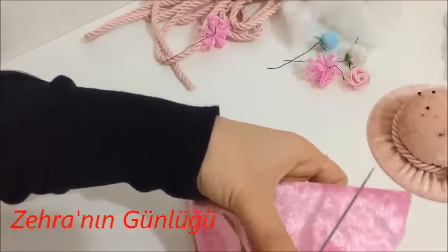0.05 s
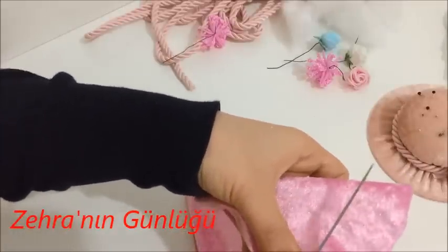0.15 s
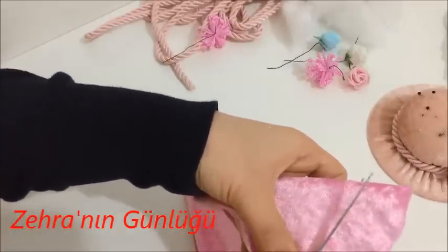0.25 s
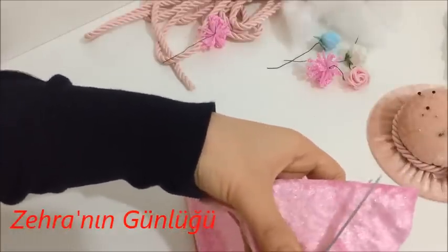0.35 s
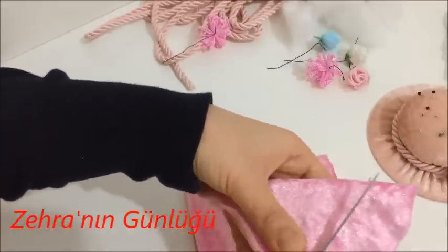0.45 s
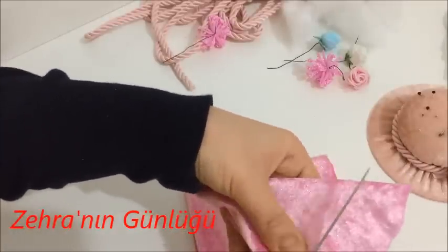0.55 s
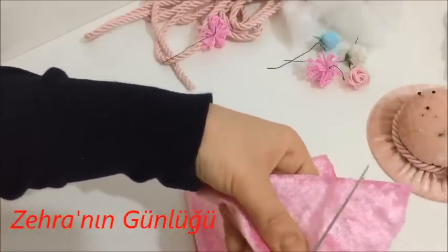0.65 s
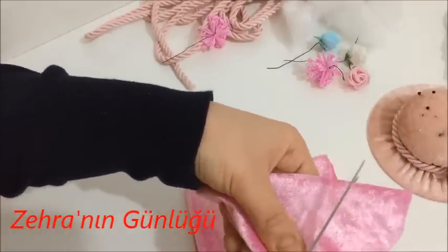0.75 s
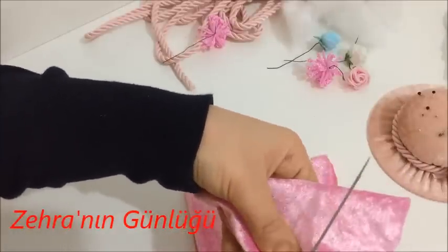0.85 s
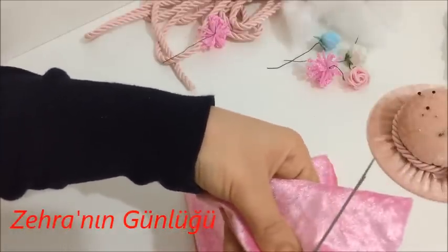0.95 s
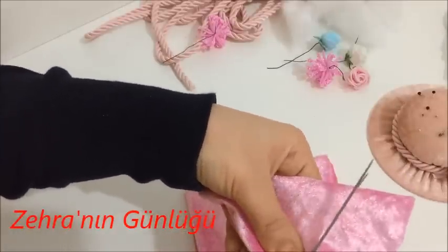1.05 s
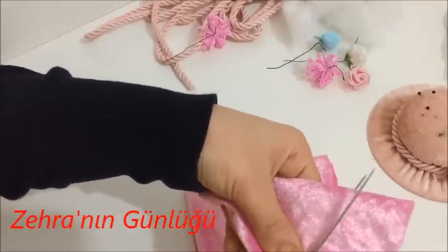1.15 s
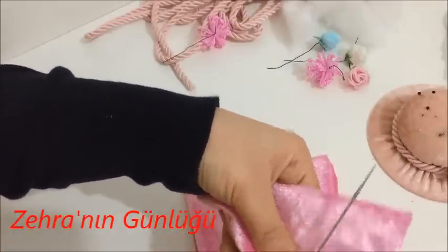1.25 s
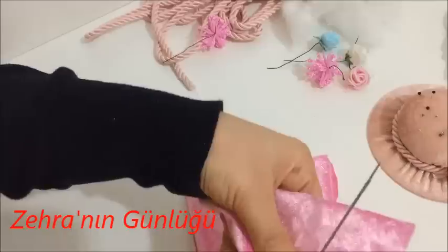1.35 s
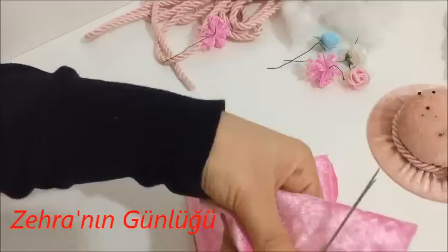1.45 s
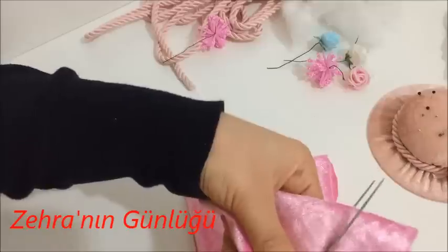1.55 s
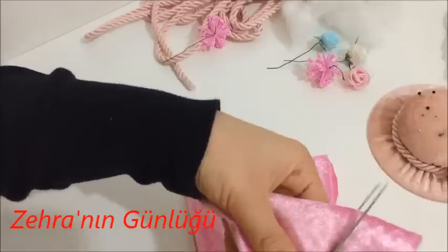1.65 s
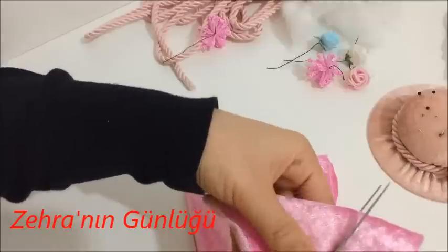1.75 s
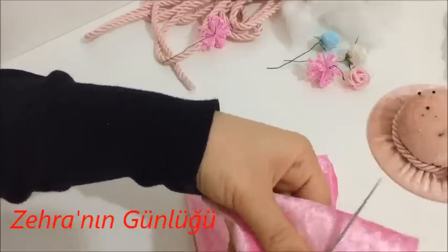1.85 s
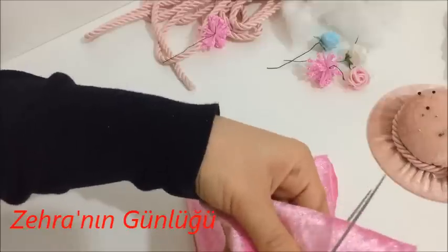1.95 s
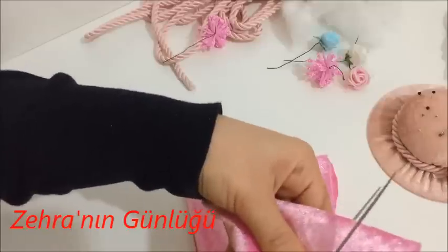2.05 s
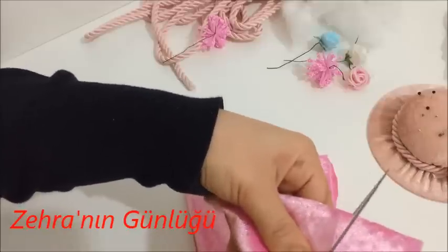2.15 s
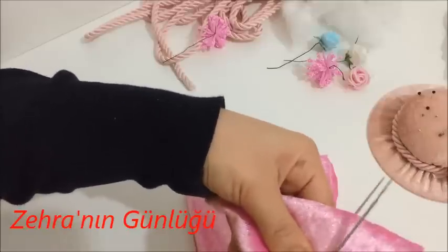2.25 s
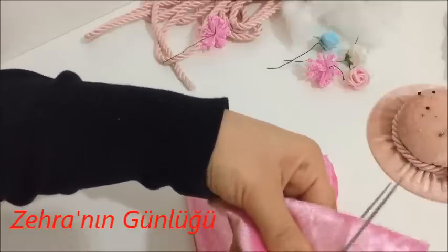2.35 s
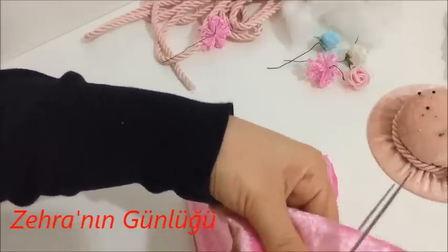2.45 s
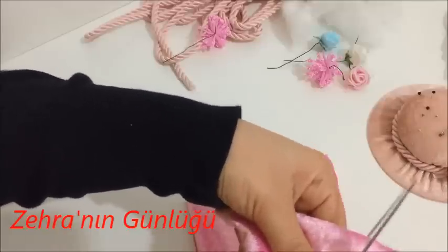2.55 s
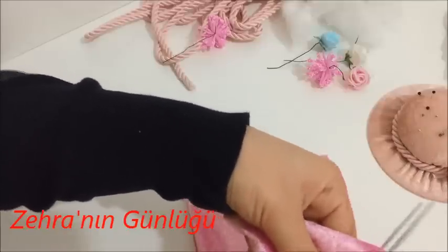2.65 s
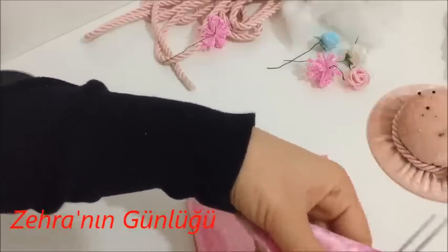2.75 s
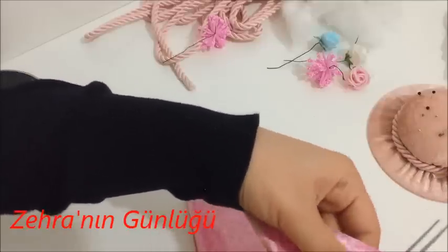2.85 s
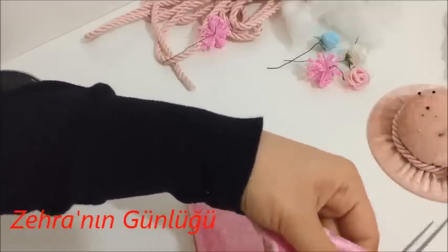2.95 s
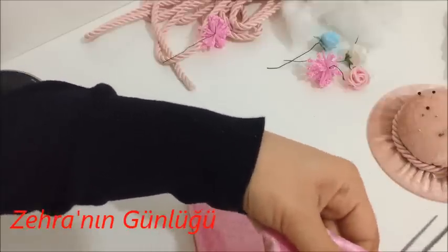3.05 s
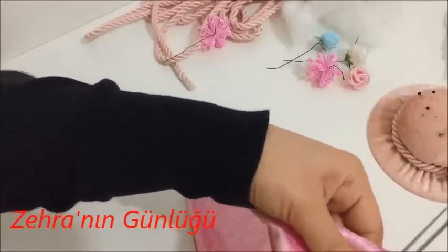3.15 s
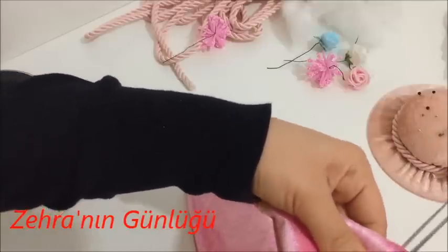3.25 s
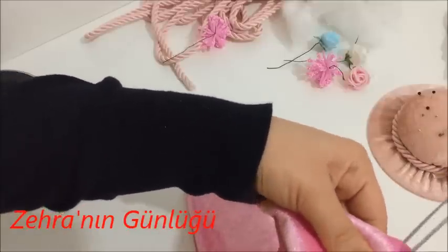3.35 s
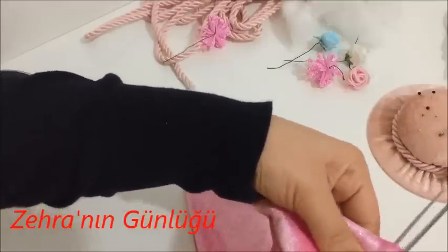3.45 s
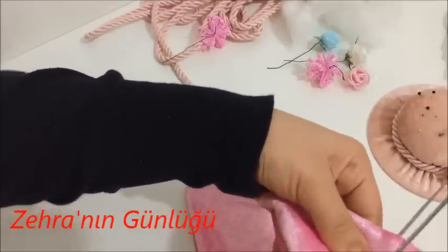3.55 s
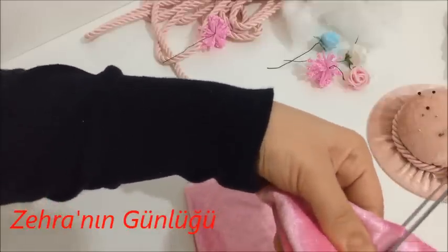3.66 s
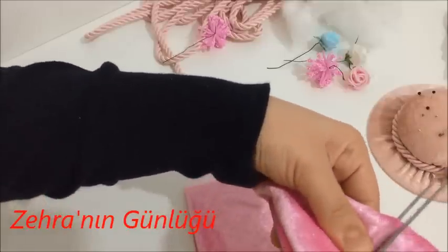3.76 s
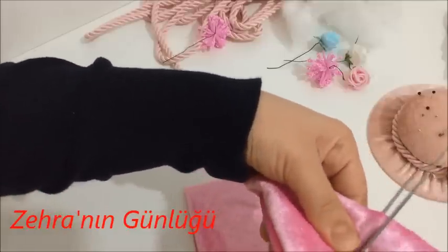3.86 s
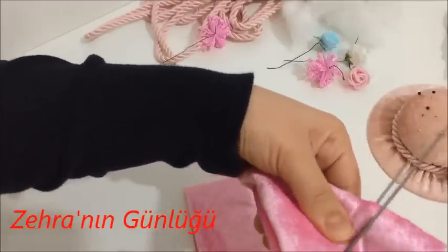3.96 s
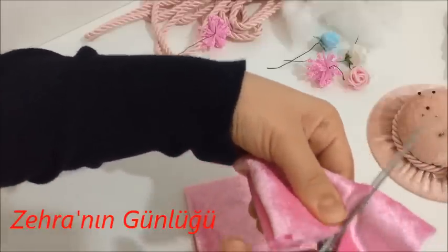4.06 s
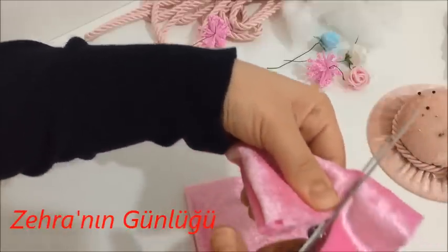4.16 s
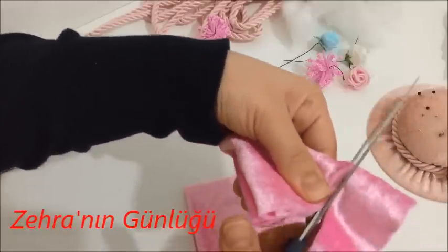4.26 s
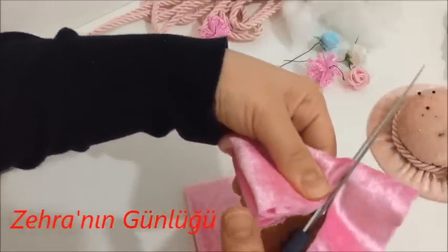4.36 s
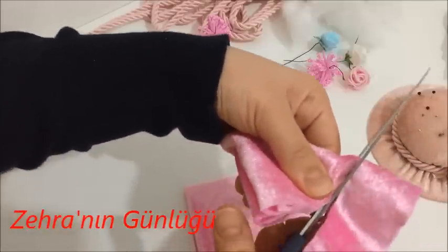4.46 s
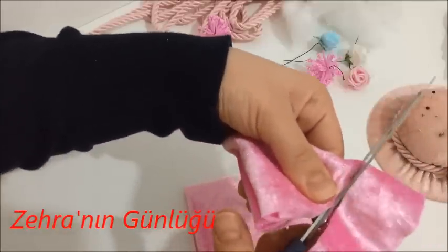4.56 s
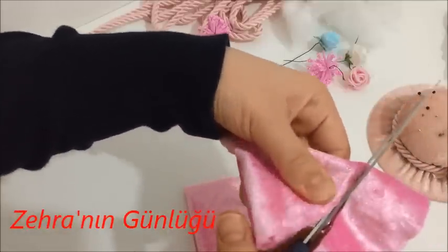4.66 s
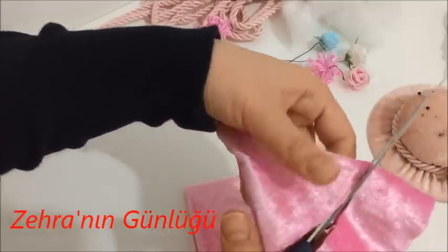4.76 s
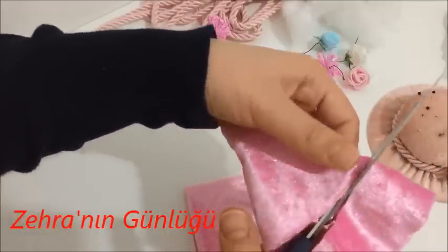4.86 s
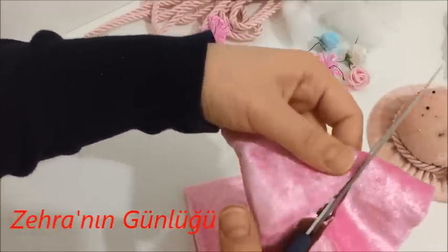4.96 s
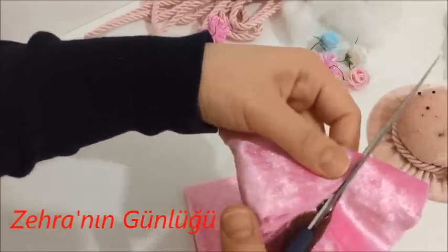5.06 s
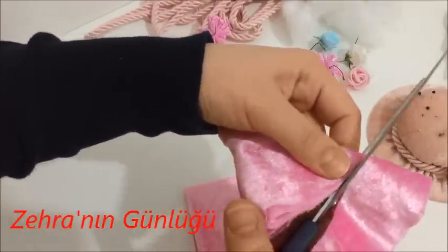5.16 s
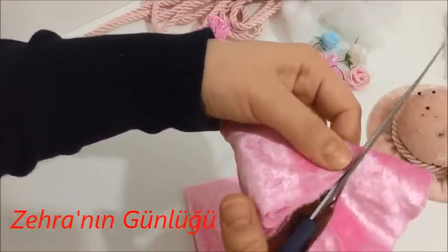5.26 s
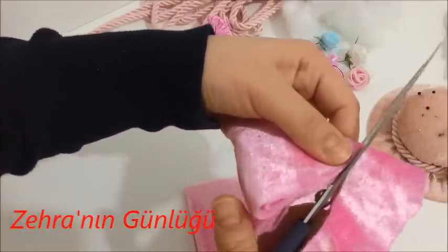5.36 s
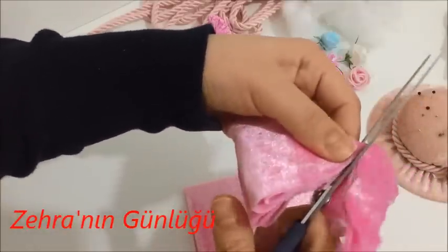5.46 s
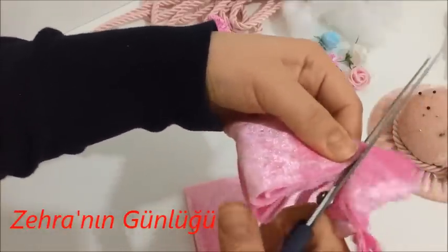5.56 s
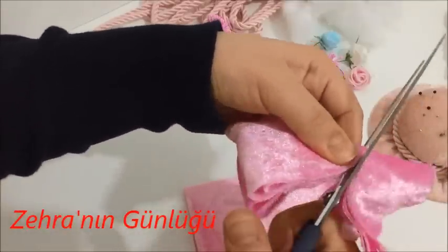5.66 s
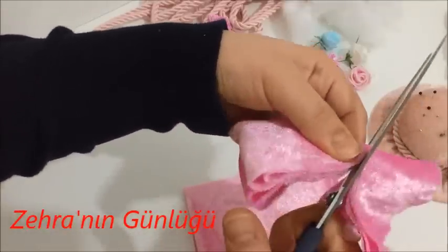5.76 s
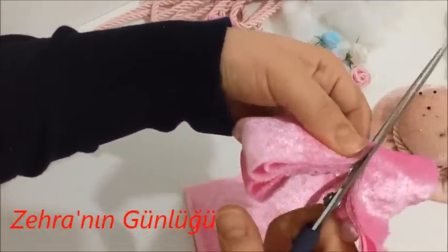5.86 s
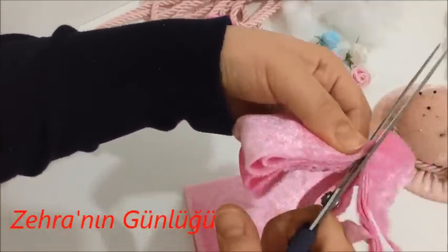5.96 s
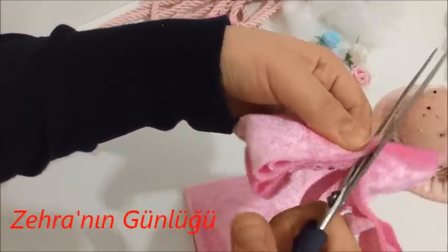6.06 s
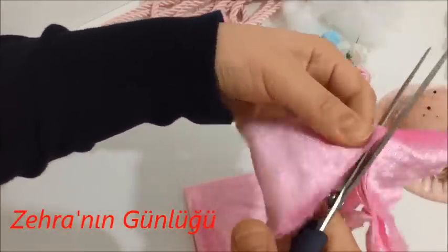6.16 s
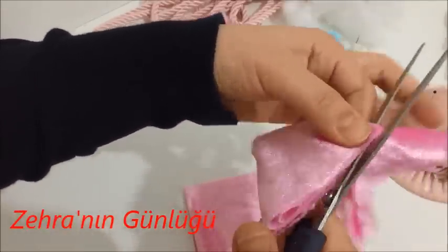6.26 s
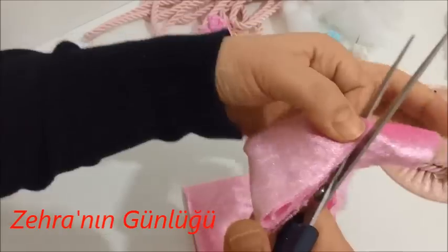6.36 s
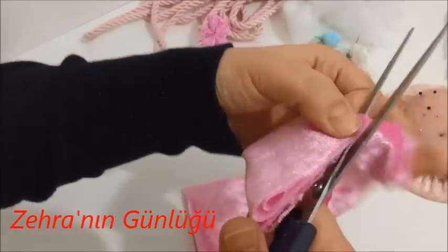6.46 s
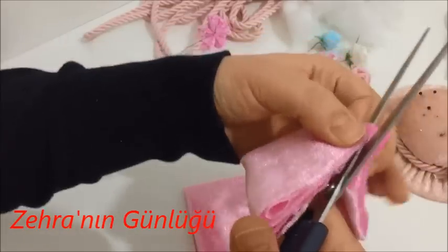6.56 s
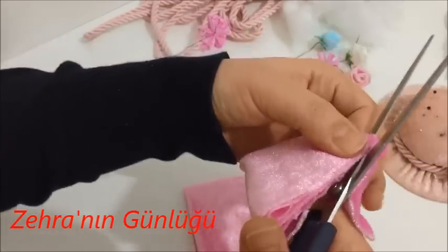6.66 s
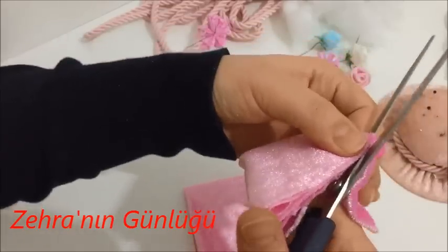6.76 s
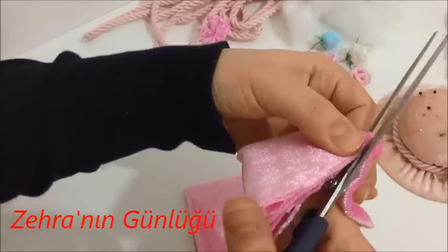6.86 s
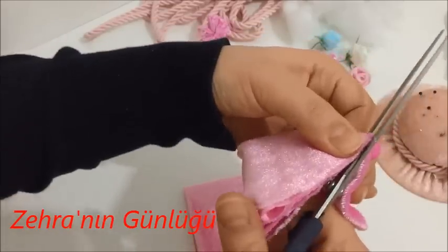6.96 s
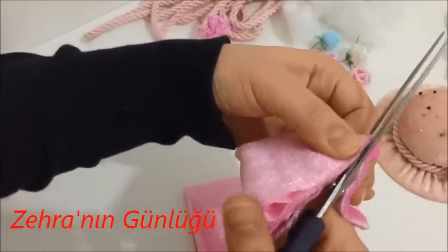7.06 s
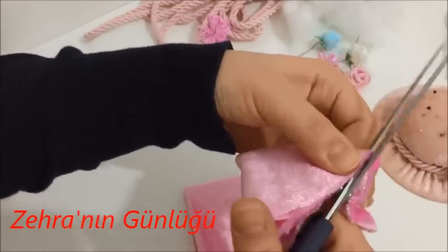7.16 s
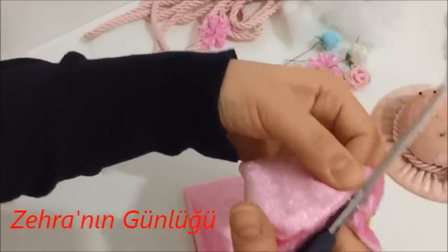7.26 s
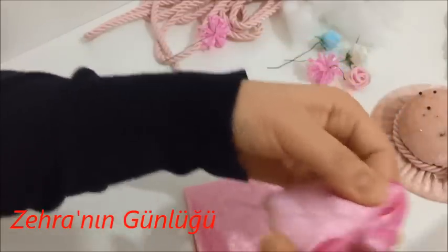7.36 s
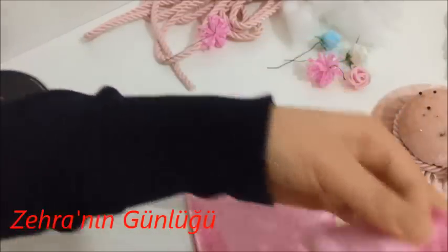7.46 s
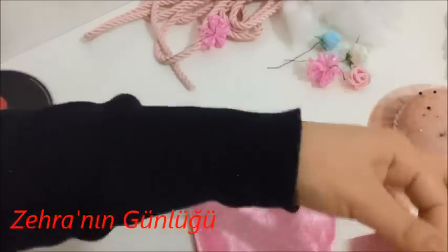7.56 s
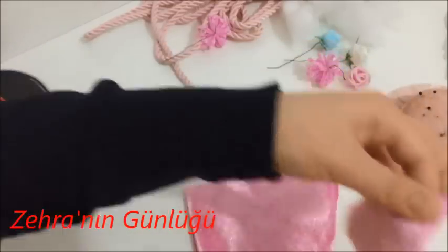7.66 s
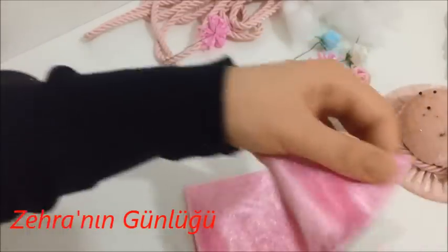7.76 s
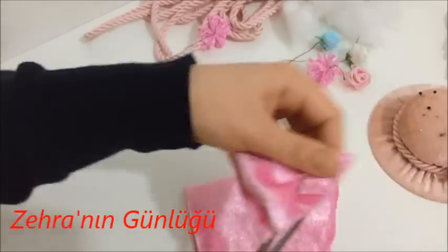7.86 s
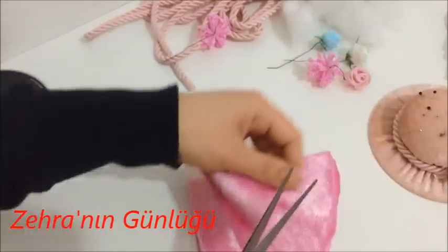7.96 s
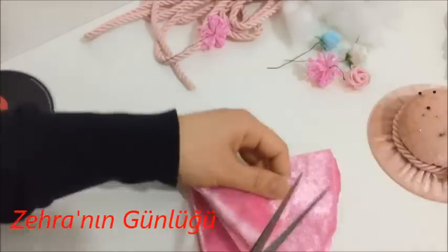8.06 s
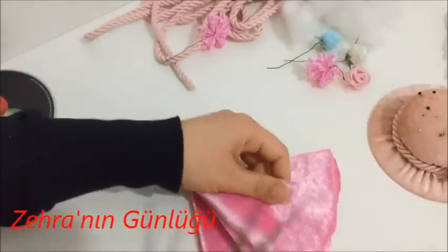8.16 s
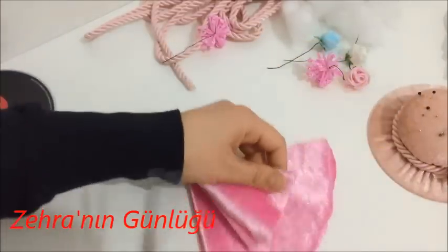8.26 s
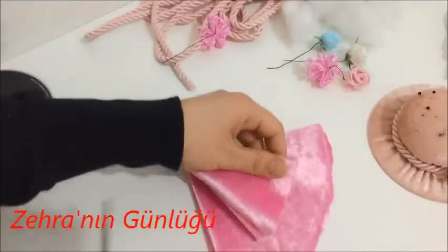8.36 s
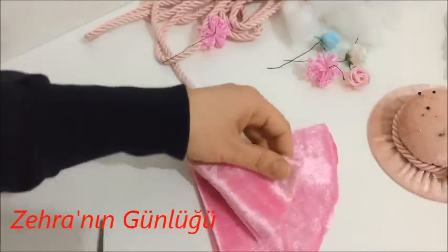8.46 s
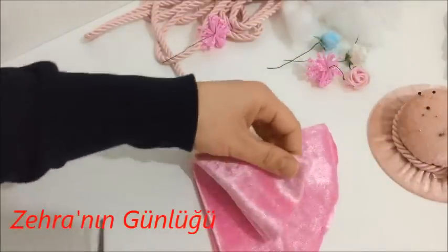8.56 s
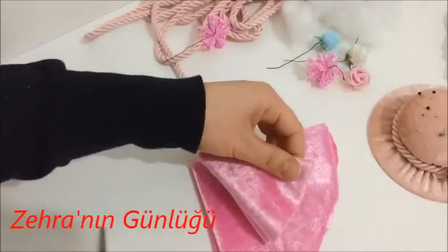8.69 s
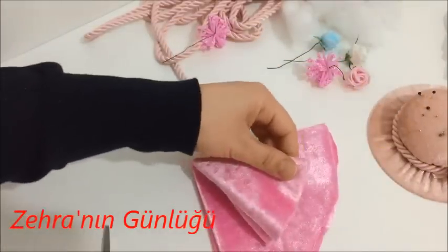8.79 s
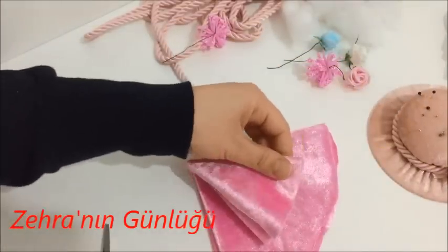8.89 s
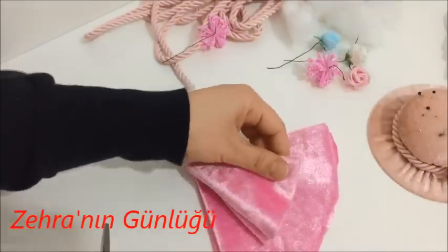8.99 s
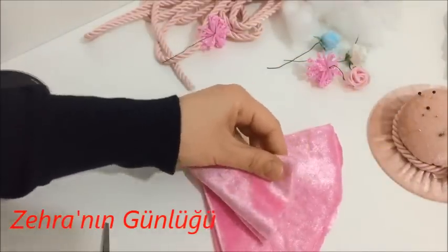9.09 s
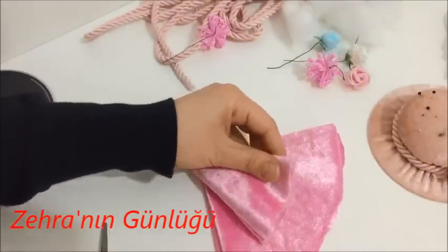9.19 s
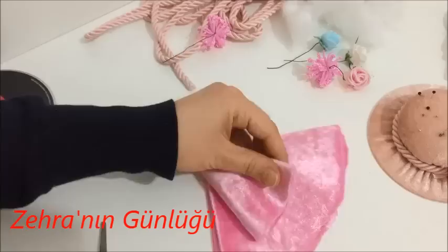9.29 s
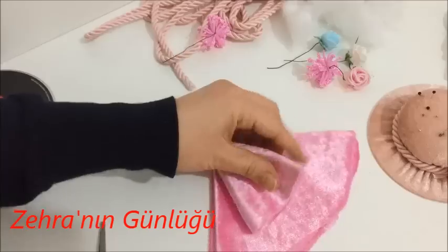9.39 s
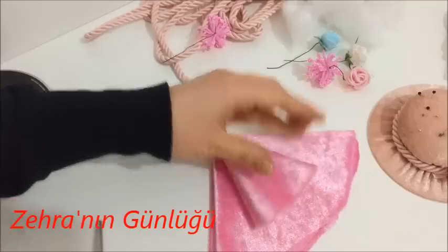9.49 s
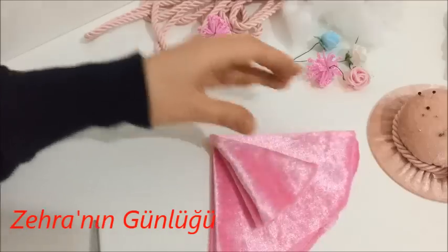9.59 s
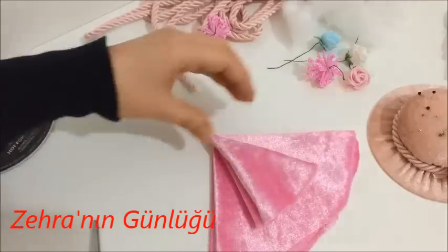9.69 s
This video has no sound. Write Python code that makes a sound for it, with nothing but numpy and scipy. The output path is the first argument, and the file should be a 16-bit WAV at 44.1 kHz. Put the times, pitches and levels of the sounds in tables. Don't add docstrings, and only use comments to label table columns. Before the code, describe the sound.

Crisp, gritty scissor cuts through cloth, spaced unevenly, followed by a squeaky pivot, light table taps and a sudden loud metallic drop.

```python
import sys
import numpy as np
from scipy import signal
from scipy.fft import rfft, irfft
from scipy.io import wavfile

SR = 44100
rng = np.random.default_rng(int(sys.argv[2]) if len(sys.argv) > 2 else 0)


def output_pcm(signal):
    pcm = np.clip(np.atleast_2d(signal).T, -1, 1) * 32767
    wavfile.write(sys.argv[1], SR, np.round(pcm).astype(np.int16))


def voltage_ratio(decibels):
    exponent = np.asarray(decibels, float) / 20
    return 10 ** exponent


N = 429093

# start in seconds, peak in dB.
BUNDLES = [(0.2546, -45.5), (0.292, -44), (0.31, -44), (0.3244, -48), (1.1555, -47), (1.5726, -35),
           (1.611, -37), (1.6432, -49), (1.665, -45.5), (2.2676, -38), (2.326, -43), (2.357, -45.5),
           (2.6933, -40.5), (2.7574, -43), (3.3243, -43), (3.3472, -46), (3.7257, -46.5), (3.785, -39),
           (3.8187, -40), (4.162, -40.5), (4.2285, -42), (4.2587, -48), (4.595, -41.5), (4.6306, -44.5),
           (5.4526, -48), (5.472, -45), (7.0495, -41), (7.056, -35), (7.319, -46), (7.5096, -48)]
# pitch in Hz, width in Hz, level in dB.
LOW_MODES = [(1320, 610, -6), (1650, 180, -6.5), (2510, 530, -1.5), (2684, 200, 6), (3690, 810, 1),
             (4520, 430, -4), (5680, 1700, 0), (6500, 1800, -4), (7440, 240, -12)]
EDGE_MODES = [(8040, 930, -5.5), (9140, 1050, 1), (9910, 670, -5), (10780, 420, -3.5), (11280, 400, -12)]
HISS_MODES = [(11870, 890, -7.5), (14200, 990, -8), (15000, 1100, -6), (16500, 400, -1)]
# time in seconds, gain of the fibre hiss in dB, ring of the free edge in Hz.
FACING = [(0.3, 0, 9540), (1.2, 1, 9450), (1.6, -1, 9540), (2.3, -3, 9470), (2.7, 3, 8400),
          (3.35, -0.5, 9660), (3.8, 2.5, 9160), (4.2, 4, 10030), (4.6, 3, 10550), (5.45, 2, 8900),
          (5.95, -9, 8700), (7.05, -3, 8930), (7.22, 8, 9500), (7.31, 5, 8500), (7.53, 0, 9200),
          (8.45, 5, 10600)]
EDGE_FACING_SHARE = -0.24


def scissors():
    time_s = np.arange(N) / SR
    all_strokes = strokes()
    low_level, edge_level, hiss_level = np.zeros((3, N))
    for rows in all_strokes:
        shear_db = in_time(rows, column=1)
        low_level += voltage_ratio(shear_db)
        edge_level += voltage_ratio(shear_db + in_time(rows, column=2))
        hiss_level += voltage_ratio(shear_db + in_time(rows, column=3))

    path = np.concatenate([rows[1:3] for rows in all_strokes])
    low_hz = np.interp(time_s, path[:, 0], path[:, 4])
    climb = np.interp(time_s, path[:, 0], path[:, 5])
    held_s, held_db, held_hz = np.transpose(FACING)
    facing_db = np.interp(time_s, held_s, held_db)
    edge_hz = np.interp(time_s, held_s, held_hz) * climb

    bundle_s, peak_db = np.transpose(BUNDLES)
    starts = np.zeros(N)
    starts[np.round(bundle_s * SR).astype(int)] = voltage_ratio(peak_db - 7.5)
    t = np.arange(SR // 40) / SR
    swell = signal.fftconvolve(starts, (t / 0.0037 * np.exp(1 - t / 0.0027)) ** 2)[:N]
    steady = np.sqrt(low_level ** 2 + edge_level ** 2 + hiss_level ** 2) + 1e-7
    uneven = voltage_ratio(2.8 * drift(90))
    effort = voltage_ratio(-1.5) * uneven + swell / steady

    threads = grit(per_s=9000, spread_db=2.0)
    low = resonate(threads, LOW_MODES, wander_db=3.0, rate_hz=12.5)
    low = low + 0.61 * glide(threads, low_hz, width_hz=165)
    edge = resonate(threads, EDGE_MODES, wander_db=5.0, rate_hz=46)
    edge = edge + 0.66 * glide(threads, edge_hz, width_hz=210)
    hiss = resonate(threads, HISS_MODES, wander_db=3.5, rate_hz=15)
    low = voltage_ratio(-1.5) * low_level * low
    edge = voltage_ratio(0.5 + EDGE_FACING_SHARE * facing_db) * edge_level * edge
    hiss = voltage_ratio(facing_db) * hiss_level * hiss
    return effort * (low + edge + hiss)


# bite in seconds, length in seconds, shear in dB at the end,
# growth in dB over the stroke, low ring in Hz at the bite.
CUTS = [(0.258, 0.077, -58, 13.5, 3030), (1.155, 0.081, -58.5, 13.5, 3380), (1.577, 0.076, -61, 2.5, 2800),
        (2.271, 0.071, -65, -1, 3700), (2.686, 0.082, -61, 6, 3700), (3.313, 0.069, -60, 6.5, 3700),
        (3.731, 0.099, -65.5, 1.5, 4860), (4.143, 0.076, -57, 12, 4720), (4.547, 0.087, -62.5, 8, 4460),
        (5.408, 0.1, -65, 5.5, 3070), (5.929, 0.043, -68, 1.5, 3300), (6.021, 0.0085, -69, 0, 3530),
        (7.005, 0.044, -72, 0.5, 2860), (7.057, 0.015, -57.5, 0.5, 2940), (7.307, .024, -68.5, -3, 3800)]
# start in seconds, length in seconds, level in dB at the end,
# growth in dB, brightness in dB.
SLIDES = [(0.11, 0.039, -75, 5, -1), (1.396, 0.057, -74.5, 1, -1), (2.517, 0.047, -70.5, 3.5, -2.5),
          (3.575, 0.027, -76, 1, -1.5), (3.988, .04, -74, -0.5, -0.5), (4.392, 0.041, -71, 2, -3),
          (7.218, .022, -73.5, 0, 1.5), (7.512, .03, -75, 0, 0), (8.413, 0.049, -58, 16, -3.5)]
CUT_EDGE_DB, CUT_HISS_DB = (2.5, 0), (1, -8)
SLIDE_EDGE_DB, SLIDE_HISS_DB = (3.5, 0), (-2, -4)
RING_SAG, SLIDE_RING_HZ = 0.937, 3050


def strokes():
    all_strokes = []
    for *row, hz in CUTS:
        all_strokes.append(stroke(*row, CUT_EDGE_DB, CUT_HISS_DB, (hz, hz * RING_SAG)))
    for *row, bright_db in SLIDES:
        edge_db = np.add(SLIDE_EDGE_DB, 2.8 * bright_db)
        hiss_db = np.add(SLIDE_HISS_DB, bright_db)
        all_strokes.append(stroke(*row, edge_db, hiss_db, [SLIDE_RING_HZ] * 2))
    return sorted(all_strokes, key=lambda rows: rows[1][0])


BITE_SHARE, BITE_DB = 0.51, 11.5
LET_GO_S, LET_GO_DB = 0.029, 27
EDGE_CLIMB = (0.92, 1.027)


def stroke(s, length_s, end_db, growth_db, edge_db, hiss_db, low_hz):
    bite, end = ([edge_db[k], hiss_db[k], low_hz[k], EDGE_CLIMB[k]] for k in range(2))
    bite_db, end_s = end_db - growth_db, s + length_s
    return [(s - BITE_SHARE * length_s, bite_db - BITE_DB, *bite), (s, bite_db, *bite),
            (end_s, end_db, *end), (end_s + LET_GO_S, end_db - LET_GO_DB, *end)]


def grit(per_s, spread_db):
    sizes = voltage_ratio(spread_db * np.minimum(rng.exponential(1, N), 4)) * rng.choice([-1, 1], N)
    return sizes * (rng.random(N) < per_s / SR)


def resonate(x, modes, wander_db, rate_hz):
    out = 0
    for k, (hz, width_hz, level_db) in enumerate(modes):
        ring = peak(peak(x, hz, width_hz), hz, width_hz)
        out = out + (-1) ** k * voltage_ratio(level_db + wander_db * drift(rate_hz)) * ring
    return rms_one(out)


def glide(x, hz, width_hz):
    turn = np.exp(2j * np.pi * np.cumsum(hz) / SR)
    r = np.exp(-np.pi * width_hz / SR)
    return rms_one((turn * signal.lfilter([1], [1, -r], x / turn)).real)


def peak(x, hz, width_hz):
    r = np.exp(-np.pi * width_hz / SR)
    poles = [1, -2 * r * np.cos(2 * np.pi * hz / SR), r * r]
    return signal.lfilter([1, 0, -1], poles, x) * (1 - r * r) / 2


def drift(rate_hz):
    r = np.exp(-2 * np.pi * rate_hz / SR)
    slow = signal.lfilter([1], [1, -2 * r, r * r], rng.standard_normal(N + SR))
    return rms_one(slow[SR:])


def in_time(rows, column):
    rows = np.array(rows)
    return np.interp(np.arange(N) / SR, rows[:, 0], rows[:, column], left=-150, right=-150)


def rms_one(x):
    return x / np.sqrt(np.mean(x ** 2) + 1e-20)


# time in seconds, pitch in Hz, level in dB.
SQUEAK = [
    (8.432, 1500, -75),
    (8.445, 1530, -52),
    (8.452, 1600, -56),
    (8.4545, 2400, -62),
    (8.457, 3300, -47),
    (8.4615, 3550, -52),
    (8.464, 3550, -75),
]


def pivot():
    turns = np.cumsum(np.maximum(in_time(SQUEAK, column=1), 0)) / SR
    tone = np.sin(2 * np.pi * turns) + 0.072 * np.sin(4 * np.pi * turns)
    return voltage_ratio(in_time(SQUEAK, column=2)) * tone


# time in seconds, boom, board, body and crack peaks in dB.
DROP = [
    (9.616, -20.5, -8, -11, -10.5),
    (9.637, -24, -12.5, -17, -45),
]
CLACKS = [
    (9.6255, -39.5, -38, -17, -10.5),
    (9.6595, -25, -20.5, -19.5, -21.5),
]
TOUCHES = [
    (8.963, -49.5, -51, -60, -77),
    (9.338, -88, -57.5, -57, -61),
    (9.594, -66, -54, -53, -61),
    (9.602, -54, -50, -50, -61),
]
# pitch in Hz, level in dB, T60 in seconds.
STEEL_ON_WOOD = [(164.9, 0, 0.2), (587, -5.5, 0.036), (740, 4, 0.015), (810, -6.5, 0.066),
                 (942, -4.5, 0.044), (1254, -2, 0.031), (1573, 3, 0.02), (2080, 5.5, 0.011),
                 (2374, -0.5, 0.026), (3002, 7.5, 0.0033), (3700, 3, 0.0057), (4400, 3, 0.0044),
                 (5200, -0.5, .007), (5320, 4, 0.0017), (6900, -3, 0.0039), (8800, -5.5, 0.0024),
                 (16140, -12, .004)]


def dropped_scissors():
    contacts = timed(TOUCHES, contact_ms=2.8) + timed(DROP, contact_ms=0.5) + timed(CLACKS, contact_ms=1.3)
    return knocks(contacts, STEEL_ON_WOOD, bare=0.31)


# time in seconds, boom, board, body and crack peaks in dB.
HANDLE_TAPS = [
    (8.866, -33.5, -36.5, -31.5, -32.5),
    (8.88, -32, -44, -39.5, -49),
]
# pitch in Hz, level in dB, T60 in seconds.
HANDLE = [(146, 1.5, 0.19), (173, 12.5, 0.18), (473, -10.5, 0.027), (954, -6.5, 0.046), (1420, -1.5, 0.011),
          (2290, 2.5, 0.025), (2800, -1.5, 0.0045), (3300, 0, 0.0073), (4390, -1, 0.0087),
          (5200, -7, 0.0078), (7960, -9.5, 0.0044), (11000, -9, 0.0042), (15000, -2, 0.0033)]


def handle():
    return knocks(timed(HANDLE_TAPS, contact_ms=0.58), HANDLE)


# time in seconds, boom, board, body and crack peaks in dB.
SPOOL_TAPS = [
    (8.641, -51.5, -36, -32.5, -44.5),
    (8.727, -54.5, -43.5, -42, -68),
]
# pitch in Hz, level in dB, T60 in seconds.
SPOOL = [(171, 0, 0.19), (425, -5, 0.067), (606, -3, 0.044), (980, -5.5, 0.03), (1234, 3, 0.043),
         (1410, 6, 0.019), (1590, 6, 0.021), (2090, 9, 0.018), (2360, -3, 0.026), (3150, 32, 0.0097),
         (4300, 12, .005), (5500, -8, 0.0061)]


def spool():
    return knocks(timed(SPOOL_TAPS, contact_ms=0.48), SPOOL, top_hz=5940)


# time in seconds, contact in ms, board, body and crack peaks in dB.
BRUSHES = [
    (.786, 0.67, -65, -57, -66),
    (6.22, 3.2, -85, -51, -52.5),
    (6.239, 3.2, -78, -61, -80),
    (7.373, 0.98, -65, -64, -58.5),
    (7.404, 4.3, -63, -54, -63),
    (7.42, 6.1, -63, -61, -76),
    (7.426, 2.1, -64, -48, -63),
    (7.511, 2.8, -65, -61.5, -79),
    (8.465, 0.69, -63, -43, -41),
    (8.566, 2.2, -77, -67, -87),
]
# pitch in Hz, level in dB, T60 in seconds.
CLOTH = [(160, 0, .1), (696, -8, 0.016), (1090, -4.5, 0.0078), (1500, 1, 0.011), (2310, 4.5, 0.0058),
         (3210, 5, 0.0033), (5660, -28, .004)]


def brushes():
    silent_db = -95
    contacts = [(s, contact_ms, silent_db, *db) for s, contact_ms, *db in BRUSHES]
    cloth = knocks(contacts[:8], CLOTH, count=1, top_hz=5100, bare=0.66)
    return cloth + knocks(contacts[8:], CLOTH, count=1)


def timed(taps, contact_ms):
    return [(s, contact_ms, *levels_db) for s, *levels_db in taps]


GROUP_FEET_HZ = [130, 400, 1050, 3000]


def knocks(contacts, modes, count=2, top_hz=19000, bare=1.24):
    out = np.zeros(N + SR)
    t = np.arange(SR // 2) / SR
    hz, mode_db, t60_s = np.transpose(modes)[:, :, None]
    group = np.searchsorted(GROUP_FEET_HZ, hz[:, 0]) - 1
    signs = (-1) ** np.arange(len(modes))[:, None]
    luck = rng.standard_normal((len(contacts), len(modes), 1))
    bounces = rng.uniform(.05, .6, (len(contacts), 6))
    for (s, contact_ms, *group_db), own, shares in zip(contacts, luck, bounces):
        rings = signs * voltage_ratio(mode_db + 1.5 * own - 60 * t / t60_s) * np.sin(2 * np.pi * hz * t)
        steps = t[:SR // 20] * 1000 / contact_ms
        push = steps * np.exp(-steps)
        rattle = chatter(contact_ms, shares, size=SR // 20)
        for k, level_db in enumerate(group_db):
            pushed = k < count
            body = rings[group == k].sum(axis=0)
            body[0] = 0 if pushed else bare
            sound = signal.fftconvolve(body, push if pushed else rattle)[:len(t)]
            foot = signal.butter(3, .75 * GROUP_FEET_HZ[k], "high", fs=SR, output="sos")
            sound = signal.sosfilt(foot, sound)
            sound = signal.sosfilt(signal.butter(4, top_hz, fs=SR, output="sos"), sound)
            out[round(s * SR):][:len(t)] += voltage_ratio(level_db) * sound / np.abs(sound).max()
    return out[:N]


def chatter(contact_ms, shares, size):
    rattle = signal.unit_impulse(size)
    for share in shares:
        echo = np.zeros(2 + int(share * contact_ms * SR / 1000))
        echo[[0, -1]] = 1, -.6
        rattle = signal.lfilter(echo[::-1], echo, rattle)
    return rattle


# start in seconds, press in seconds, peak in dB, hold in seconds,
# release in seconds over 30 dB.
LEANS = [
    (4.742, 0.066, -72, .005, 0.7),
    (5.874, 0.044, -67, .1, 1),
    (6.454, 0.011, -50.5, 0.081, 0.23),
    (6.72, .026, -63, .003, .06),
]
# pitch in Hz, width in Hz, level in dB.
FRAME = [(81.3, 22, 8), (162.6, 35, 6.5), (260, 120, -14), (564, 310, -27)]


def table_frame():
    push = 0
    for s, press_s, db, hold_s, release_s in LEANS:
        pressed_s = s + press_s
        held_s = pressed_s + hold_s
        rows = [(s, db - 20), (pressed_s, db), (held_s, db - 2), (held_s + release_s, db - 30)]
        push = push + voltage_ratio(in_time(rows, column=1))
    return push * resonate(rng.standard_normal(N), FRAME, wander_db=1.0, rate_hz=8)


def room(x):
    t60_s, dull_hz = 0.26, 6000
    t = np.arange(SR // 2) / SR
    echoes = rng.standard_normal(len(t)) * voltage_ratio(-60 * t / t60_s) * np.minimum(t / 0.0005, 1)
    echoes = signal.sosfilt(signal.butter(1, dull_hz, fs=SR, output="sos"), echoes)
    echoes = signal.sosfilt(signal.butter(2, 380, "high", fs=SR, output="sos"), echoes)
    return signal.fftconvolve(x, echoes / np.sqrt(np.sum(echoes ** 2)))[:N]


# pitch in Hz, level in dB per Hz.
HUSH = [(13, -64), (22, -3), (32, -11.5), (59, 0.5), (160, -1.5), (539, -10.5), (988, -13.5), (1130, -14),
        (2260, -15.5), (4500, -18.5), (4890, -20), (6620, -21), (10600, -24), (14700, -27), (16000, -30)]
HUSH_DB = -69


def hush():
    hz = np.maximum(np.arange(N // 2 + 1) * SR / N, 1)
    points = np.array(HUSH)
    shape = voltage_ratio(np.interp(np.log(hz), np.log(points[:, 0]), points[:, 1]))
    noise = irfft(rfft(rng.standard_normal(N)) * shape, N)
    rumble = signal.sosfiltfilt(signal.butter(2, 400, fs=SR, output="sos"), noise)
    return voltage_ratio(HUSH_DB) * rms_one(noise - rumble + rumble * voltage_ratio(1.0 * drift(9.8)))


def scene():
    blades = scissors() + pivot() + brushes()
    blows = dropped_scissors() + handle() + spool()
    faint = blades + room(voltage_ratio(-17.5) * blades) + table_frame() + hush()
    faint = signal.sosfilt(signal.ellip(10, .3, 60, 15830, fs=SR, output="sos"), faint)
    return (faint + blows + room(voltage_ratio(-10.0) * blows))[None]


def band_limit(x):
    return signal.sosfilt(signal.butter(12, 16810, fs=SR, output="sos"), x)


# pitch in Hz, width in Hz, depth from 0 to 1.
HOUSING = [(4650, 360, 0.01), (7700, 510, 0.16), (10440, 560, 0.35)]


def record(dry):
    for hz, width_hz, depth in HOUSING:
        dry = dry - depth * peak(dry, hz, width_hz)
    dry = signal.sosfilt(signal.cheby2(10, 50, 17000, fs=SR, output="sos"), dry)
    return band_limit(dry)


dry = scene()
out = record(dry)
output_pcm(out)
```